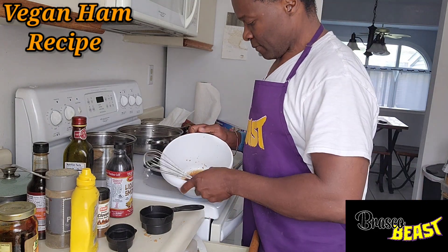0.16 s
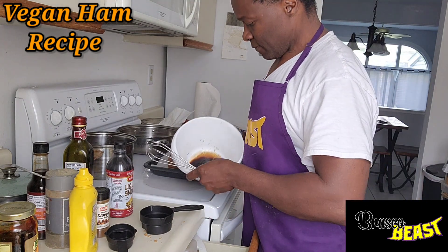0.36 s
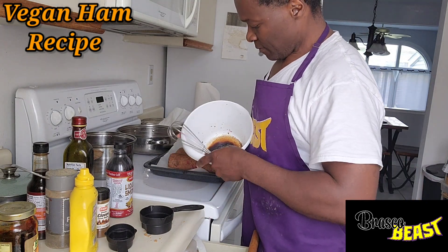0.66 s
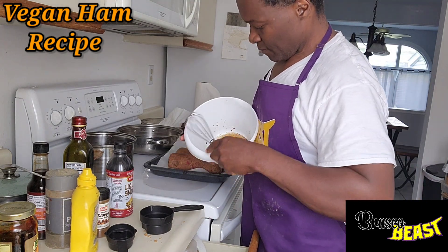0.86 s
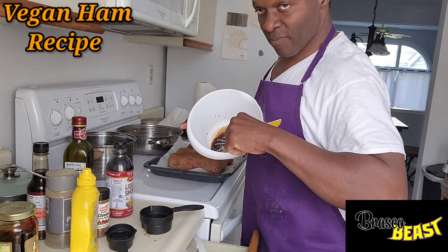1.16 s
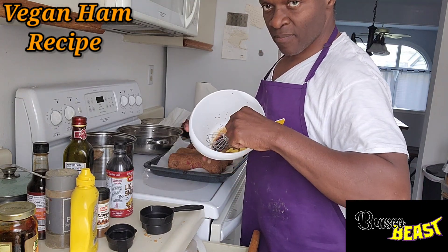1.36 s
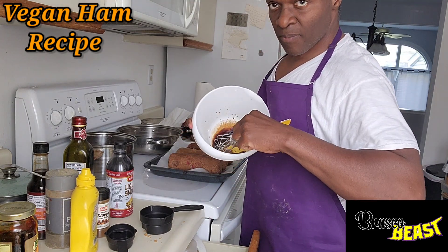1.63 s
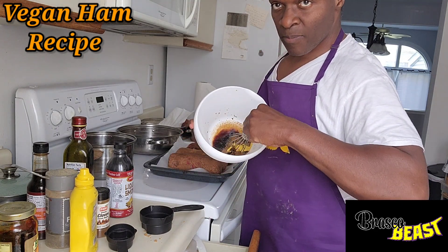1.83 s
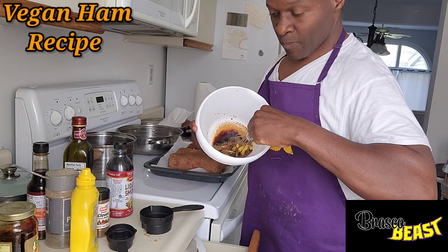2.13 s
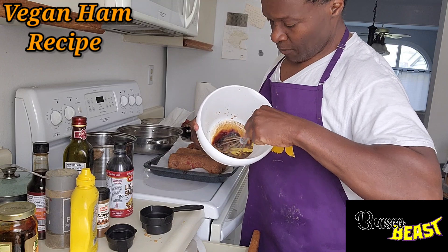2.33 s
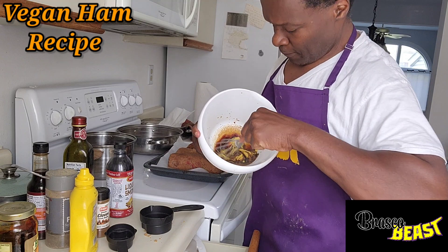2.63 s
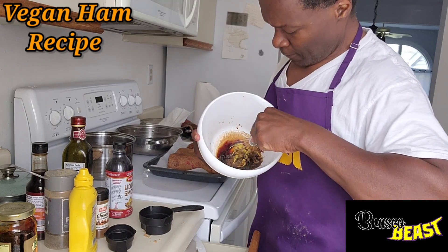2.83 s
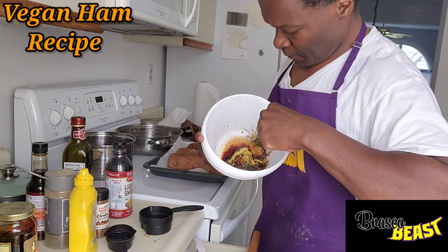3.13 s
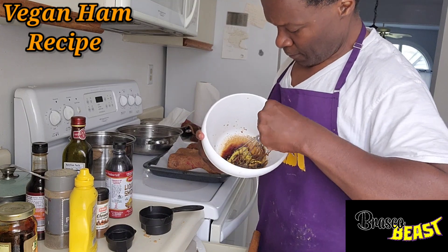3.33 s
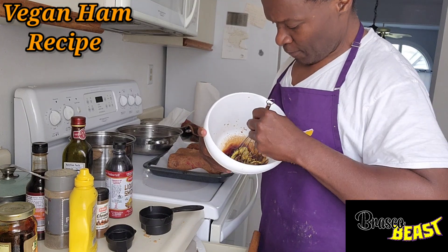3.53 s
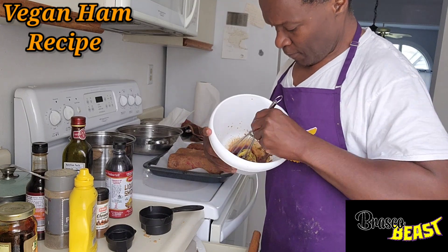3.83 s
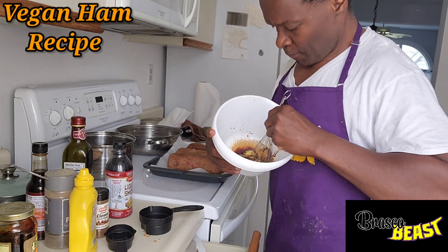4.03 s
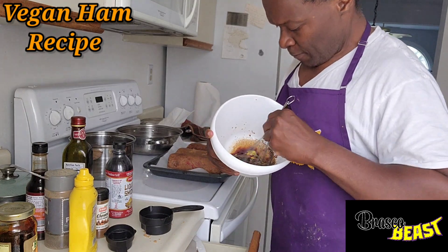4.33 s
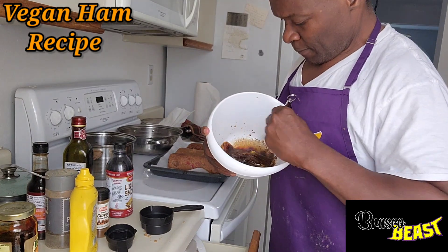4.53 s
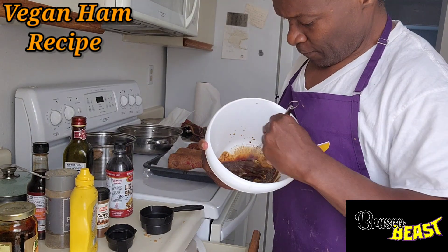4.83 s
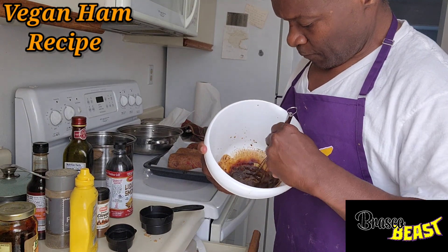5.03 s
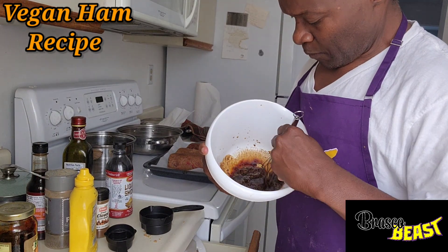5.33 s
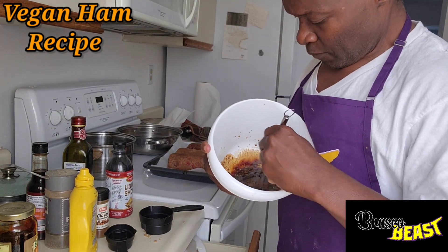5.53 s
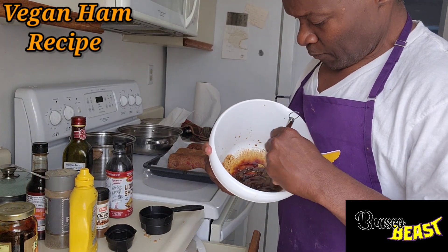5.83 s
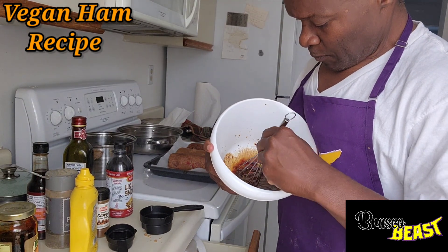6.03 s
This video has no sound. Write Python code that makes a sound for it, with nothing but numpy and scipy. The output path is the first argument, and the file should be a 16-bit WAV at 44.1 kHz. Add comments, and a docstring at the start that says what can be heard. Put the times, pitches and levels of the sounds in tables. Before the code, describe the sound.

Close up in a small, quiet kitchen, a whisk works in a plastic bowl. First come a soft knock, rubbing fabric and scattered thin clicks; after about two seconds the stirring settles into three or four strokes a second, thudding and squelching, with gritty scraping and a few loud clacks. The later strokes are wetter and denser. Slight echo, faint handling rumble and still air, in stereo.

```python
"""Wires clack and scrape on the wall of a plastic bowl, and a whisk thuds through thick glaze, in a small kitchen.
Each clack is a click with buzz and rebounds through the wall resonances; each thud a push that rings low modes.
Drags and swishes are swells of tiny bursts; the scrape is random slips, with a wet crackle above.
A sleeve rustles as filtered noise with catching threads, over a low rumble and still air.
The stereo picture has close echoes, a room tail and small level differences between two microphones."""
import sys
import numpy as np
from scipy import signal
from scipy.fft import rfft, irfft, next_fast_len
from scipy.io import wavfile

SR = 44100
rng = np.random.default_rng(int(sys.argv[2]) if len(sys.argv) > 2 else 0)


def to_wav(sig):
    """Store sig (one row per channel, or 1-D mono) as 16-bit WAV at the path in sys.argv[1].

    Samples outside -1..1 are clipped; the rate is SR.
    """
    pcm = np.clip(np.atleast_2d(sig), -1, 1) * 32767
    pcm = np.round(pcm).astype(np.int16)
    wavfile.write(sys.argv[1], SR, pcm.T)  # frames by channels


N = 272538
TIME = np.arange(N) / SR

# Levels in the tables are relative: colouring, placing and mixing follow.

# THE ROOM AND THE MICROPHONES
# kitchen decay: (frequency [Hz], t60 [s])
KITCHEN_DECAY = [(200, 0.24), (600, 0.3), (1500, 0.29), (3500, 0.26), (8000, 0.25), (15000, 0.21)]
# likeness of the two channels in diffuse sound: (frequency [Hz], likeness [0-1])
CHANNEL_LIKENESS = [(60, .98), (130, .95), (290, .85), (640, .35), (1400, .05), (15000, 0)]
# tilt between the microphones: (frequency [Hz], left minus right [dB])
MICROPHONE_LEAN = [(100, -1), (350, -1.5), (650, -6.5), (1300, 0), (2400, -1.5), (4400, 4), (8000, -1),
                   (14000, 5.5)]
# where the contact lies between the microphones: (time [s], left minus right [dB])
CONTACT_PLACE = [(0.1, -0.5), (1.2, -1), (1.8, -0.5), (2.7, 1.5), (3.3, -0.1), (4.05, 1), (4.62, 1),
                 (4.95, 0.5), (6.18, 0)]
CUTOFF_HZ = 15900

# spectrum of the still air: (frequency [Hz], level [dB])
AIR_COLOUR = [(100, -24.5), (200, 0), (400, -7), (580, -4), (760, -14), (1100, -16), (2200, -17),
              (5000, -29), (8500, -38), (16000, -46)]
AIR_DB = -63
# course of the low rumble: (time [s], level [dB])
RUMBLE_LEVEL = [(0, -53.5), (0.1, -61), (1.4, -60.5), (2.7, -58), (3.6, -61.5), (4.7, -62.5), (6.18, -60)]
# spectrum of the low rumble: (frequency [Hz], level [dB])
RUMBLE_COLOUR = [(12, -14), (20, -1), (59, 1), (134, 0), (172, -18), (188, -12), (232, -8.5), (338, -14.5),
                 (370, -18), (450, -12), (580, -47), (990, -120)]

# the sleeve rubs on the apron: (start [s], level [dB], hold [s])
SLEEVE_RUBS = [(0.325, -61, 0.16), (0.603, -57.5, 0.049), (0.743, -60.5, .01)]
# spectrum of the rubbed cloth: (frequency [Hz], level [dB])
SLEEVE_COLOUR = [(350, -68), (600, -22), (748, -4), (997, -8.5), (1370, -9), (1750, -4), (3340, -1.5),
                 (3890, -2.5), (8500, -11.5), (14900, -13.5), (16000, -15)]
RUB_ATTACK_S, RUB_T60_S = 0.041, 0.41

# the bowl is bumped while it is lifted and gripped: (time [s], level [dB], firmness [dB per register])
BUMPS = [(0.074, -60, -5), (0.12, -42, 2.5), (0.412, -55, -7), (0.544, -56, -6.5), (0.723, -54.5, -3),
         (1.027, -57, -3.5), (0.857, -60, -2.5), (1.146, -57, -3.5), (1.923, -68.5, 7), (2.484, -60, -4.5)]
BUMP_FLEX_HZ = 190
# each turn of the whisk plunges into the glaze and drags through it: (time [s], thud level [dB],
# flex pitch [Hz], firmness [dB per register], drag level [dB], time to the height of the drag [s])
STROKES = [(2.29, -56.5, 294, -1.5, -54, 0.06), (2.565, -44.5, 340, -4, -52.5, 0.071),
           (2.872, -46.5, 408, -4.7, -50, 0.075), (3.39, -56, 493, 0.5, -57.5, 0.066),
           (3.703, -60.5, 490, 4.5, -64, .035), (3.944, -46, 424, -0.5, -55, 0.037),
           (4.191, -59.5, 300, -3, -51.5, 0.039), (4.502, -44.5, 210, 0.5, -50, 0.056),
           (4.823, -50.5, 494, 8.5, -51, .068), (5.128, -47, 162, -3, -40, 0.059),
           (5.426, -47.5, 330, 1, -46.5, 0.054), (5.672, -56.5, 302, 3.5, -40.5, 0.095),
           (5.941, -44, 252, 3.5, -41.5, 0.058)]
# low modes of the loaded bowl: (frequency [Hz], level [dB], t60 [s])
BOWL_MODES = [(103, 4, 0.051), (229.4, -17.5, 0.21), (345, 1, 0.037), (448, -7.5, 0.11),
              (556.7, -1.5, 0.12), (790, -17, 0.038)]
# borders between the registers of a thud: (frequency [Hz])
THUD_EDGES_HZ = [55, 170, 480, 720]
# borders between the registers of a drag: (frequency [Hz])
DRAG_EDGES_HZ = [240, 480, 700]
DRAG_SPREAD = .33  # half length of a drag, as a share of the time to its height

# pressure and wetness of the stirring: (time [s], scrape level [dB], wet fizz level [dB])
STIRRING = [(0.901, -66, -76.5), (1.62, -65, -80), (1.85, -70.5, -85), (2.24, -75, -81.5), (2.62, -60, -69),
            (3.12, -65, -76), (3.49, -100, -110), (3.77, -78, -78.5), (4.03, -52.5, -74), (4.25, -63, -71),
            (4.4, -48, -63.5), (4.53, -53, -72.5), (4.97, -57.5, -70.5), (5.36, -54.5, -68.5),
            (5.62, -52, -55), (5.74, -56, -72), (5.87, -57, -65.5), (6.18, -61.5, -76)]
# spectrum of scraping wires: (frequency [Hz], level [dB])
SCRAPE_COLOUR = [(500, -16), (900, -6.5), (1400, -7), (2100, -5.5), (3000, -8), (4300, -11), (5300, -4),
                 (8000, -14.5), (11000, -22.5), (15500, -23)]
# wires sweep out through the glaze: (time of height [s], level [dB], pitch [Hz], half length [s])
SWISHES = [(1.568, -60, 2120, 0.014), (2.116, -57.5, 1610, .016), (2.347, -51, 2900, .023),
           (2.39, -51, 2070, 0.018), (2.621, -42.5, 1640, 0.021), (2.955, -48.5, 1540, 0.037),
           (3.817, -49.5, 2220, .023), (3.877, -44, 1970, .02), (4.172, -51, 2810, .027),
           (4.439, -39.5, 2170, .02), (4.666, -39.5, 2250, .013), (4.729, -46, 2170, 0.019),
           (5.185, -47, 2950, 0.012), (5.323, -44.5, 1940, .026), (5.423, -49, 1370, 0.0028),
           (5.52, -42, 2010, .007), (5.59, -42, 2020, 0.024), (5.64, -41.5, 2550, 0.0071),
           (5.776, -47, 1260, 0.017), (5.884, -52, 1860, 0.03), (6.132, -46.5, 2140, 0.015)]
# borders between the body and the spray of a swish: (frequency [Hz])
SWISH_EDGES_HZ = [1100, 3600, 16000]
# quicker swishes throw more spray
SPRAY_DB, USUAL_SWISH_S, SPRAY_DB_PER_HALVING = -11, 0.015, 2

# a wire hits the wall: (time [s], strength [dB], clack pitch [Hz],
# bowl body re strength [dB], treble slope [dB per register])
TAPS = [(0.122, -36.5, 800, 4, -5), (0.723, -46.5, 1550, 5.5, -9.5), (0.77, -45, 2230, -7, -6.5),
        (1.222, -36, 2140, -11.5, -1), (1.297, -47, 2000, -12, -13), (1.416, -43.5, 1380, -14, -1.5),
        (1.685, -30.5, 2790, -17, -6), (2.007, -67.5, 3370, -13, 4.5), (2.05, -42, 2240, -11.5, -12),
        (2.678, -25.5, 3130, -19, -5.5), (2.874, -52, 2930, -20, -9.5), (3.001, -27, 1740, -17.5, -5),
        (3.196, -34.5, 1320, -10, -5), (4.027, -20, 2250, -15.5, -1.4), (4.32, -26, 1420, -10, -6.7),
        (4.609, -21, 2890, -18, -4), (4.937, -40, 1940, -5, -5), (4.989, -44.5, 2550, -18, -7.5),
        (5.111, -46, 1830, -28, -6.5), (5.227, -39.5, 2220, -7, -5.8), (5.801, -45.5, 1980, -6.5, -5.5),
        (5.844, -41.5, 2150, -28, -10), (5.916, -43.5, 1430, -12, -4.5), (6.058, -49.5, 1990, -5.5, -8)]
# borders between the registers of a tap: (frequency [Hz])
TAP_EDGES_HZ = [400, 1100, 1800, 3700, 8000, 16000]
# spectrum of a tap: (frequency [Hz], level [dB])
TAP_COLOUR = [(250, -5.5), (450, -4.5), (700, -8), (950, -9), (1400, 1.5), (2000, -2.5), (2600, 0.5),
              (3200, -2), (4300, -8.5), (5300, -4.5), (8300, -21.5), (10000, -20.5), (15500, -27)]
# wall resonances: (frequency [Hz], width [Hz], level [dB])
WALL_RESONANCES = [(1073, 15, -10), (1329, 33, 14), (1605, 240, -24), (2087, 19, 15.5), (2350, 61, -29),
                   (3160, 105, 5.5), (3630, 44, -15), (3910, 130, -5), (4615, 350, -28), (5150, 49, -20),
                   (5570, 310, -2), (8000, 600, -26)]
# the higher the clack, the less of it lies in the low register
EVEN_CLACK_HZ, LOW_CLACK_DB_PER_OCTAVE = 1354, -6.5


def from_db(db):
    """Decibels to gain."""
    return 10 ** (np.asarray(db) / 20)


def rms_one(x):
    """Scale to rms 1."""
    return x / np.sqrt(np.mean(x ** 2) + 1e-20)


def unit_energy(x):
    """Scale to a mean energy of 1 a channel."""
    return rms_one(x) / np.sqrt(x.shape[-1])


def at_hz(points, hz):
    """Read a table on a log-frequency axis."""
    f, value = np.transpose(points)
    return np.interp(np.log(np.maximum(hz, 1)), np.log(f), value)


def in_time(rows):
    """A level curve [dB] read at every sample, -120 dB before it starts."""
    return np.interp(TIME, *np.transpose(rows), left=-120)


def band(x, low_hz, high_hz, order=2):
    """Butterworth band-pass."""
    edges = [low_hz, min(high_hz, .48 * SR)]
    return signal.sosfilt(signal.butter(order, edges, "band", fs=SR, output="sos"), x + 1e-18)


def colour(x, spectrum):
    """Causal (minimum-phase) filter with the given spectrum."""
    size = 8192
    gain = from_db(at_hz(spectrum, np.fft.rfftfreq(size, 1 / SR)))
    cepstrum = irfft(np.log(gain))
    # folding the cepstrum forward makes the phase minimal
    cepstrum[1:size // 2] *= 2
    cepstrum[size // 2 + 1:] = 0
    return signal.fftconvolve(x, irfft(np.exp(rfft(cepstrum))))[:len(x)]


def resonate(x, hz, width_hz):
    """One resonance, gain 1 on top."""
    r = np.exp(-np.pi * width_hz / SR)
    zeros = np.array([1, 0, -1]) * (1 - r * r) / 2
    poles = [1, -2 * r * np.cos(2 * np.pi * hz / SR), r * r]
    return signal.lfilter(zeros, poles, x + 1e-18)


def dying(t, t60):
    """Exponential decay, down 60 dB at t60."""
    return np.exp(-np.log(1000) * t / t60)


def drift(rate):
    """Slow random curve of rms 1, with the given number of knots per second."""
    knots = rng.standard_normal(int(N / SR * rate) + 2)
    return rms_one(np.interp(TIME * rate, np.arange(len(knots)), knots))


def wander(x, depth_db, rate):
    """As the contact point moves, each register swells and fades on its own."""
    edges = np.geomspace(700, 17000, num=10)
    total = 0
    for k, (low, high) in enumerate(zip(edges, edges[1:])):
        total = total + band(x, low, high) * from_db(depth_db * drift(rate)) * (-1) ** k
    return rms_one(total)


def grains(per_s, spread_db, clump_db):
    """Random clicks of uneven size that come in clumps."""
    spread = spread_db * np.minimum(rng.exponential(1, N), 4)
    sizes = from_db(spread + clump_db * drift(70))
    return sizes * rng.choice([-1, 1], N) * (rng.random(N) < per_s / SR)


def swell(t, length_s, share, grain_db):
    """Uneven tiny bursts that rise and fall around t = 0; share is the part of samples that sound."""
    sizes = from_db(grain_db * rng.standard_normal(len(t)))
    bursts = rng.standard_normal(len(t)) * sizes * (rng.random(len(t)) < share)
    return bursts * np.exp(-.5 * (t / length_s) ** 2)


def add(out, x, s):
    """Mix x in from time s."""
    start = max(round(s * SR), 0)
    out[..., start:start + x.shape[-1]] += x[..., :N - start]


def weigh(blow, edges, levels_db):
    """Where and how hard a blow lands sets the strength of each register."""
    registers = zip(edges, edges[1:], levels_db)
    return sum(from_db(db) * unit_energy(band(blow, low, high, order=3)) for low, high, db in registers)


def diffuse(size):
    """Stereo noise from all sides: alike in the bass, unrelated in the treble."""
    length = next_fast_len(size, real=True)
    alike = np.clip(at_hz(CHANNEL_LIKENESS, np.fft.rfftfreq(length, 1 / SR)), 0, 1)
    mid, side = rfft(rng.standard_normal((2, length)))
    spectra = np.sqrt(1 + alike) * mid + np.sqrt(1 - alike) * side * [[1], [-1]]
    return irfft(spectra, length)[:, :size]


def hiss(spectrum):
    """Coloured diffuse noise, rms 1."""
    return rms_one(np.array([colour(side, spectrum) for side in diffuse(N)]))


def kitchen(x, direct_db=-2, near_db=0, near_t60=0.12, tail_db=-3, build_s=0.0031):
    """Direct sound, quick reflections from bowl, body and stove, then the room; each call has its own echoes."""
    t = np.arange(SR // 3) / SR
    edges = np.geomspace(170, 19000, num=6)
    noise = diffuse(len(t))
    tail = 0
    for low, high in zip(edges, edges[1:]):
        tail = tail + band(noise, low, high) * dying(t, at_hz(KITCHEN_DECAY, np.sqrt(low * high)))
    tail = tail * (1 - np.exp(-t / build_s))
    near = rng.standard_normal(noise.shape) * dying(t, near_t60) * (rng.random(noise.shape) < .15)
    near = band(near, 510, 17100)  # small surfaces return no bass
    response = from_db(near_db) * unit_energy(near) + from_db(tail_db) * unit_energy(tail)
    # the direct sound reaches the left microphone three samples before the right
    response[[0, 1], [0, 3]] += from_db(direct_db)
    return signal.fftconvolve(x[None], unit_energy(response), axes=1)[:, :len(x)]


def still_air():
    """The air of the room: steady diffuse noise."""
    return from_db(AIR_DB) * hiss(AIR_COLOUR)


def rumble():
    """Low handling rumble: diffuse bass noise of slowly changing level."""
    return from_db(4.5 + in_time(RUMBLE_LEVEL)) * hiss(RUMBLE_COLOUR)


def sleeve(flutter_db=0.6, catch_db=-3):
    """Cloth slides on the apron, its threads catching; each rub rises, holds and dies."""
    threads = grains(per_s=510, spread_db=-0.5, clump_db=-0.5)
    catches = rms_one(kitchen(colour(threads, SLEEVE_COLOUR)))
    cloth = hiss(SLEEVE_COLOUR) + from_db(catch_db) * catches
    cloth = wander(cloth, depth_db=3.5, rate=21.54)
    rubs = np.zeros(N)
    for s, db, hold_s in SLEEVE_RUBS:
        rise = np.clip((TIME - s) / RUB_ATTACK_S, 0, 1)
        fall = dying(np.maximum(TIME - s - RUB_ATTACK_S - hold_s, 0), RUB_T60_S)
        rubs += from_db(db) * rise * fall
    return rubs * from_db(flutter_db * drift(41.5)) * cloth


def thud(flex_hz, firm_db, contact_s=0.0018, push=2.9, flex=0.78, flex_t60=0.071,
         thump_db=-1, flex_db=-1, hollow_db=0, slap_db=-17, slap_t60=.09):
    """A cushioned push with ringing low modes and a soft slap; firmness trades thump for hollow note."""
    t = np.arange(SR // 3) / SR
    blow = push * t / contact_s * np.exp(1 - t / contact_s)  # greatest at contact_s
    blow = blow + flex * np.sin(2 * np.pi * flex_hz * t) * dying(t, flex_t60)
    for hz, db, t60 in BOWL_MODES:
        gain = from_db(db + rng.normal(0, 0.49))
        mode_hz = hz * (1 + rng.normal(0, 0.014))
        blow = blow + gain * np.sin(2 * np.pi * mode_hz * t) * dying(t, t60)
    blow = kitchen(blow, direct_db=-0.5, near_db=-1.5, near_t60=0.047, tail_db=-2.5)
    slap = unit_energy(band(diffuse(len(t)) * dying(t, slap_t60), 830, 2600))
    levels_db = [thump_db - firm_db, flex_db, hollow_db + firm_db]
    return weigh(blow, THUD_EDGES_HZ, levels_db) + from_db(slap_db) * slap


def thuds():
    """The bowl thuds when it is bumped and at the start of each stroke."""
    out = np.zeros((2, N))
    for s, db, firm_db in BUMPS:
        add(out, from_db(db) * thud(BUMP_FLEX_HZ, firm_db), s)
    for s, db, flex_hz, firm_db, _, _ in STROKES:
        add(out, from_db(db) * thud(flex_hz, firm_db), s)
    return out


def drags(hollow_hz=582, hollow_width_hz=22, slush_db=-8, low_db=-6):
    """After each plunge the whisk judders through the glaze and keeps the hollow of the bowl sounding."""
    out, t = np.zeros((2, N)), np.arange(-SR // 10, SR // 5) / SR
    for s, _, _, _, db, rise_s in STROKES:
        slips = swell(t, DRAG_SPREAD * rise_s, share=0.027, grain_db=2.5)
        hollow = unit_energy(resonate(slips, hollow_hz, hollow_width_hz))
        slush = unit_energy(band(slips, 302, 440))
        drag = kitchen(hollow + from_db(slush_db) * slush, near_db=-4.5, tail_db=-7.0)
        add(out, weigh(drag, DRAG_EDGES_HZ, [db + low_db, db]), s + rise_s + t[0])
    return out


def swishes(squelch_db=-4, squelch_width_hz=450):
    """A short swell of tiny wet bursts, coloured by the pocket of air between the wires."""
    out, t = np.zeros(N), np.arange(-SR // 10, SR // 10) / SR
    for s, db, hz, length_s in SWISHES:
        bursts = swell(t, length_s, share=.015, grain_db=3.0)
        squelch = unit_energy(resonate(bursts, hz, squelch_width_hz))
        swish = unit_energy(colour(bursts, SCRAPE_COLOUR)) + from_db(squelch_db) * squelch
        spray_db = SPRAY_DB + SPRAY_DB_PER_HALVING * np.log2(USUAL_SWISH_S / length_s)
        add(out, weigh(swish, SWISH_EDGES_HZ, [db, db + spray_db]), s + t[0])
    return out


def scrape(scrape_db=-1, fizz_db=1):
    """Wires slip over sugar grains on the wall; the wet film crackles above."""
    pressure, wetness = (from_db(in_time(np.array(STIRRING)[:, [0, k]])) for k in (1, 2))
    slips = rms_one(grains(per_s=750, spread_db=3.5, clump_db=3.5))
    sound = wander(colour(slips, SCRAPE_COLOUR), depth_db=3.5, rate=26)
    rub = pressure * rms_one(band(sound, 775, 3700))
    fizz = wetness * rms_one(band(sound, 8050, 13000))
    return from_db(scrape_db) * rub + from_db(fizz_db) * fizz


def wall(x):
    """Each place on the wall brings out its resonances in a new mix."""
    mix_db = rng.normal(0, 3, len(WALL_RESONANCES))
    total = 0
    for k, (hz, width_hz, db) in enumerate(WALL_RESONANCES):
        total = total + from_db(db + mix_db[k]) * resonate(x, hz, width_hz) * (-1) ** k
    return total


def taps(buzz=0.16, buzz_t60=0.01, rebound=0.25, ring_db=-6.0, clack_db=-5, clack_width_hz=220,
         lead_db=-19, lead_s=0.0091):
    """A wire snaps on the wall, its neighbours land just after and the wall rings; faint hiss swells into it."""
    out, t = np.zeros((2, N)), np.arange(SR // 3) / SR
    lead = SR // 40  # samples of hiss ahead of the snap
    for s, db, hz, body_db, slope_db in TAPS:
        # the wire buzzes on contact
        crack = signal.unit_impulse(len(t)) + buzz * rng.standard_normal(len(t)) * dying(t, buzz_t60)
        # neighbouring wires
        crack[rng.integers(SR // 2000, SR // 120, size=3)] += rebound * rng.choice([-1, 1], size=3)
        blow = unit_energy(colour(crack, TAP_COLOUR)) + from_db(ring_db) * unit_energy(wall(crack))
        blow = blow + from_db(clack_db) * unit_energy(resonate(crack, hz, clack_width_hz))
        lead_in = rng.standard_normal(lead) * np.exp(-t[:lead][::-1] / lead_s)
        lead_in = from_db(lead_db) * unit_energy(colour(lead_in, TAP_COLOUR))
        tap = np.concatenate([lead_in, blow])
        tap = kitchen(tap, direct_db=1.0, near_db=6.5, near_t60=0.1, tail_db=2.0)
        low_db = LOW_CLACK_DB_PER_OCTAVE * np.log2(hz / EVEN_CLACK_HZ)
        tap = weigh(tap, TAP_EDGES_HZ, [body_db, low_db, 0, slope_db, 2 * slope_db])
        add(out, from_db(db) * tap, s - lead / SR)
    return out


def scene():
    """The bowl and the sleeve before two microphones in the kitchen, over handling rumble and still air."""
    wet = from_db(28.0) * swishes() + scrape()
    wet = kitchen(wet, direct_db=-5, near_db=1.5, near_t60=0.1, tail_db=-5.5)
    bowl = from_db(28.5) * taps() + from_db(33) * thuds() + from_db(31.5) * drags() + wet
    place_db = np.interp(TIME, *np.transpose(CONTACT_PLACE)) * [[.5], [-.5]]
    near = bowl * from_db(place_db) + from_db(4) * sleeve()
    leaning = []
    for side, sign in zip(near, (1, -1)):
        tilt = [(hz, sign * db / 2) for hz, db in MICROPHONE_LEAN]
        leaning.append(colour(side, tilt))
    return np.array(leaning) + rumble() + still_air()


def record(dry):
    """A steep elliptic low-pass cuts the top."""
    return signal.sosfilt(signal.ellip(12, .2, 85, CUTOFF_HZ, fs=SR, output="sos"), dry)


dry = scene()
out = record(dry)
to_wav(out)
```